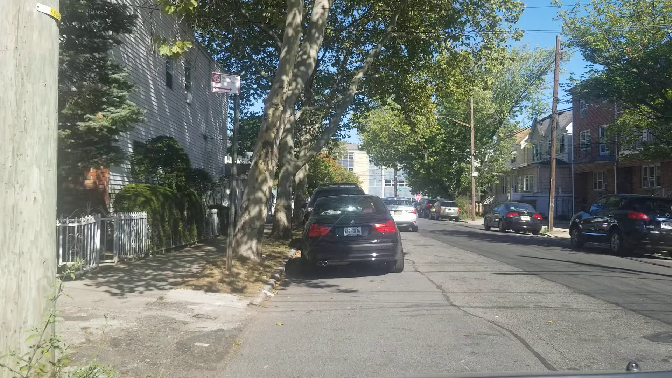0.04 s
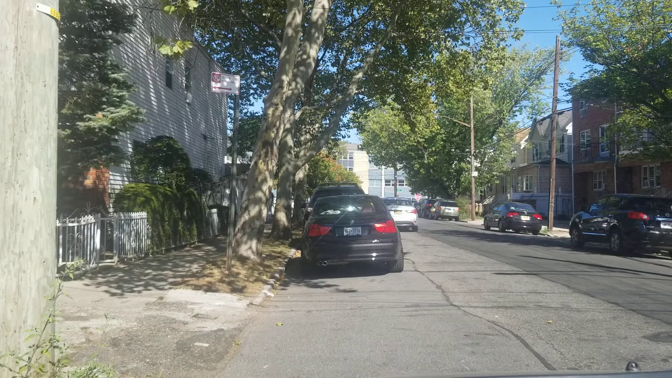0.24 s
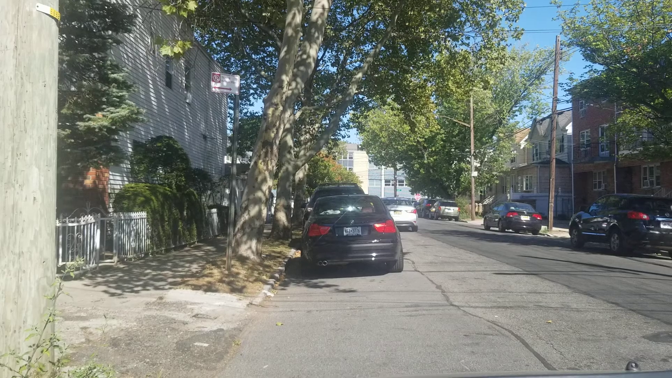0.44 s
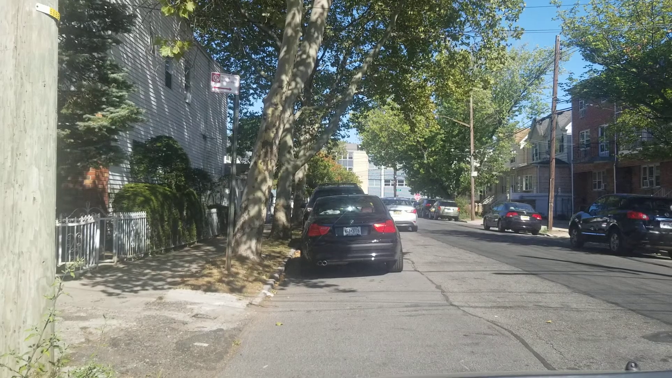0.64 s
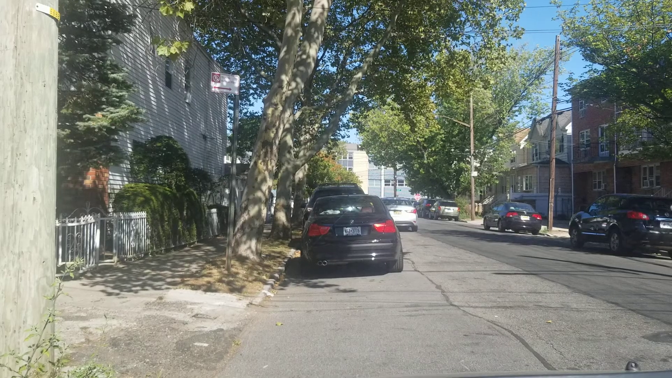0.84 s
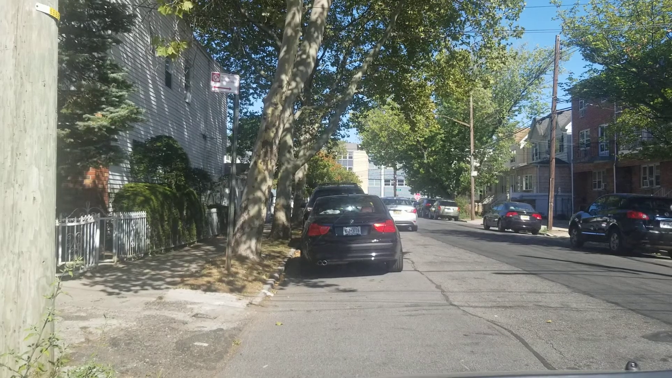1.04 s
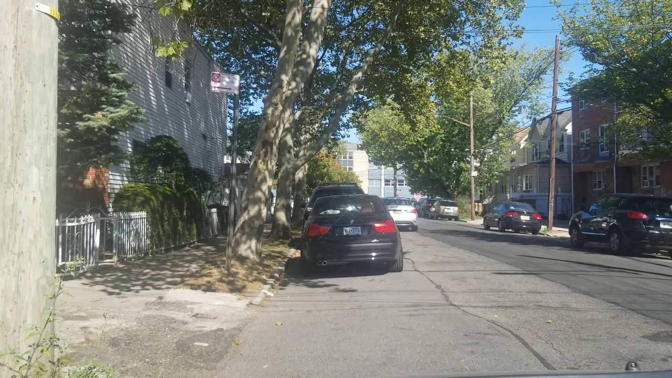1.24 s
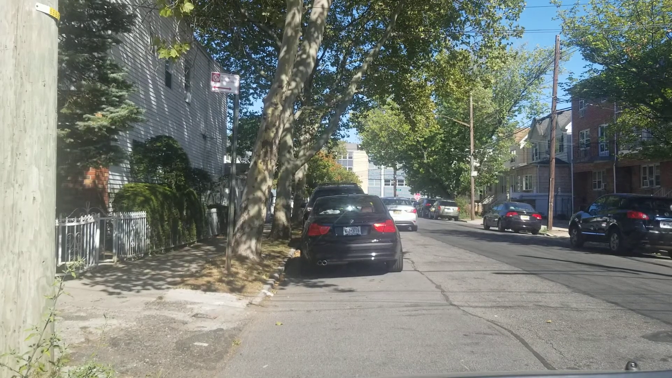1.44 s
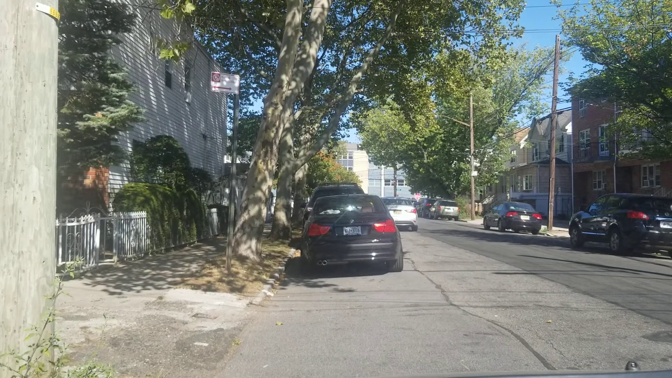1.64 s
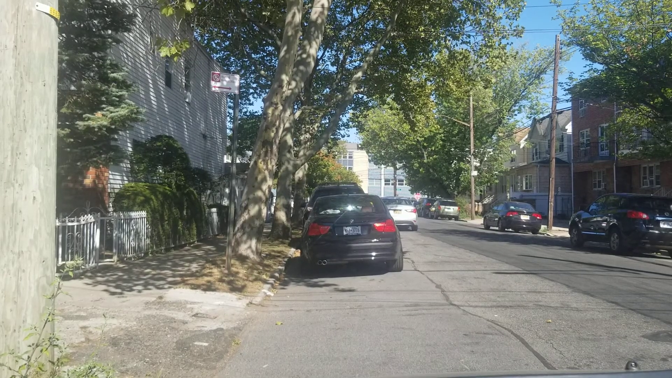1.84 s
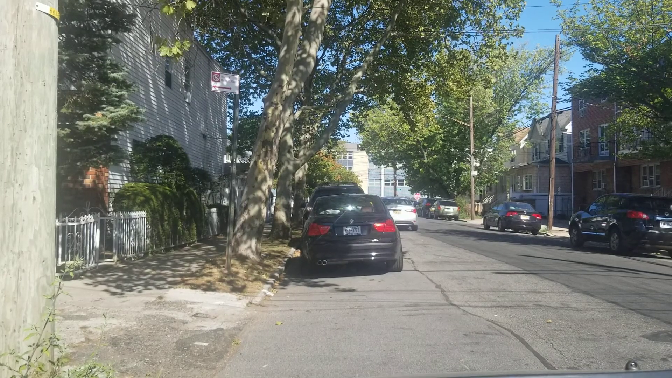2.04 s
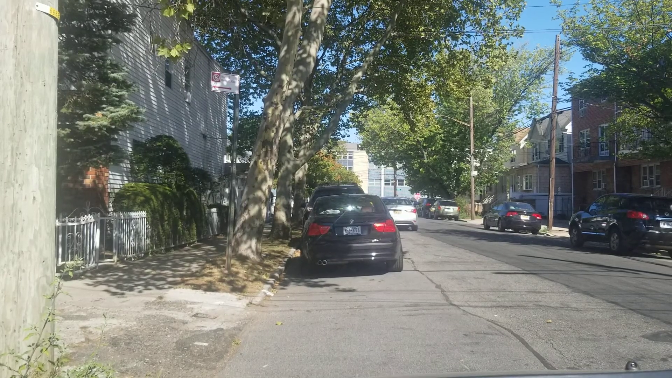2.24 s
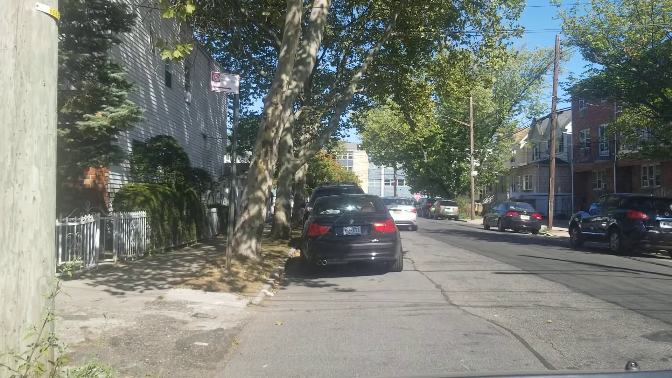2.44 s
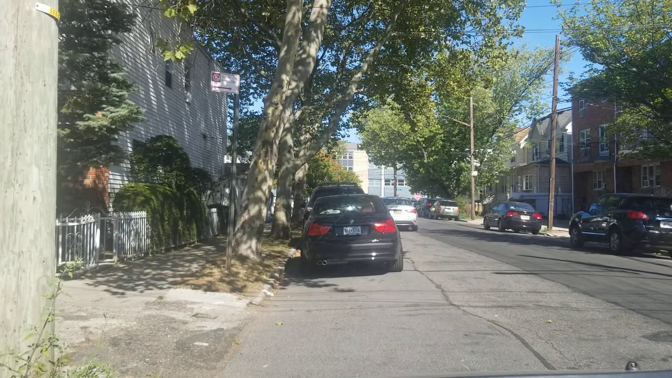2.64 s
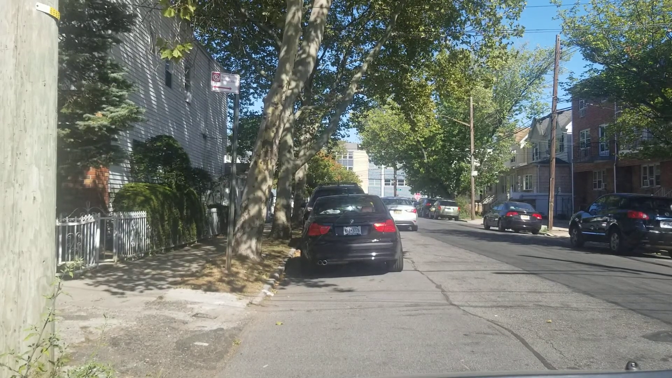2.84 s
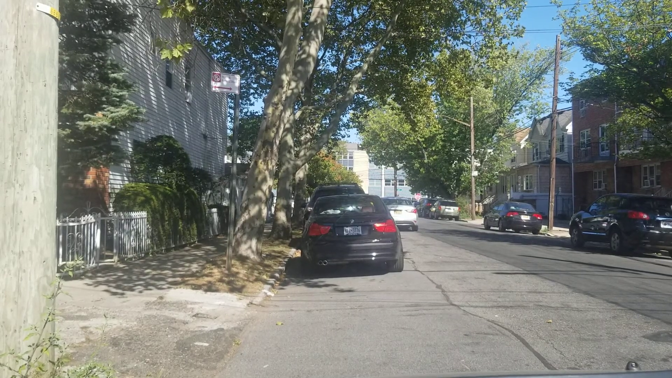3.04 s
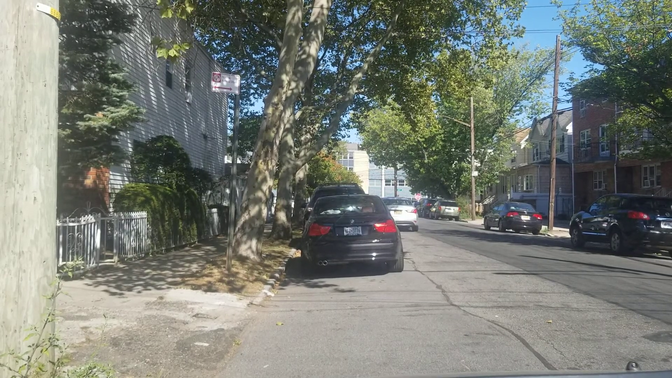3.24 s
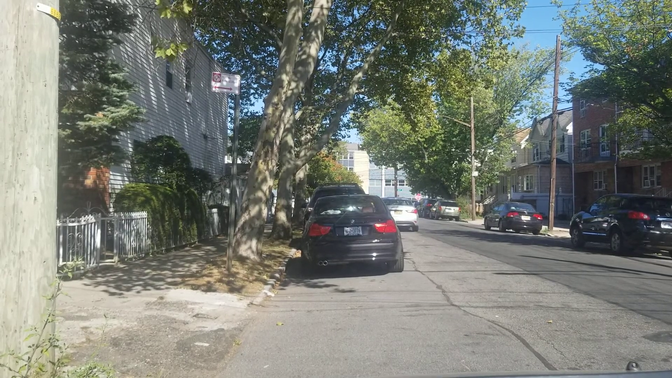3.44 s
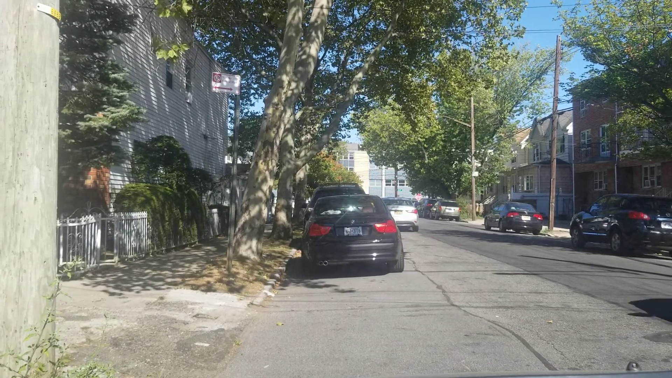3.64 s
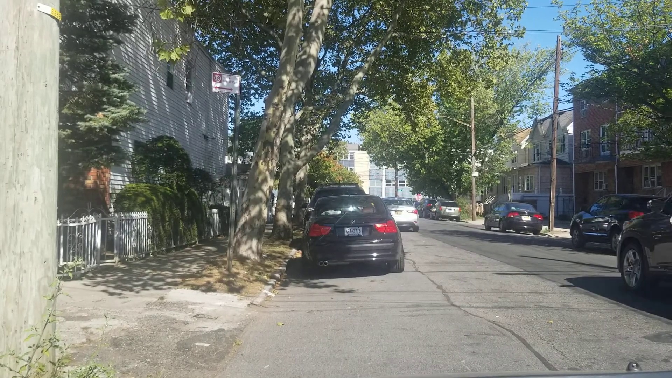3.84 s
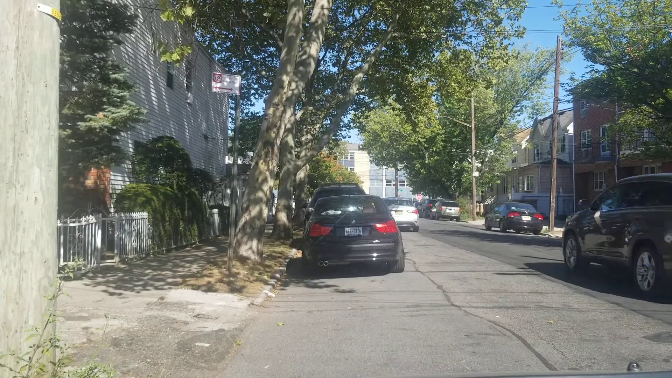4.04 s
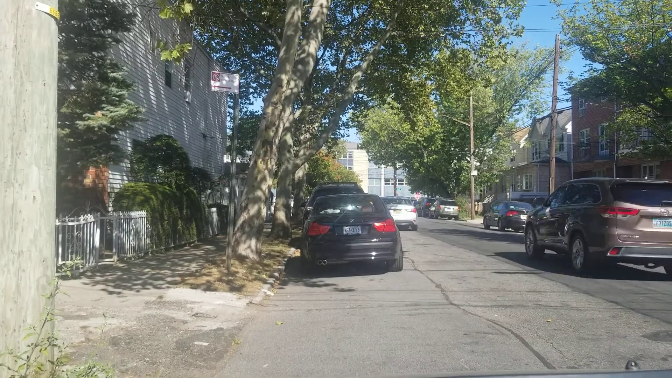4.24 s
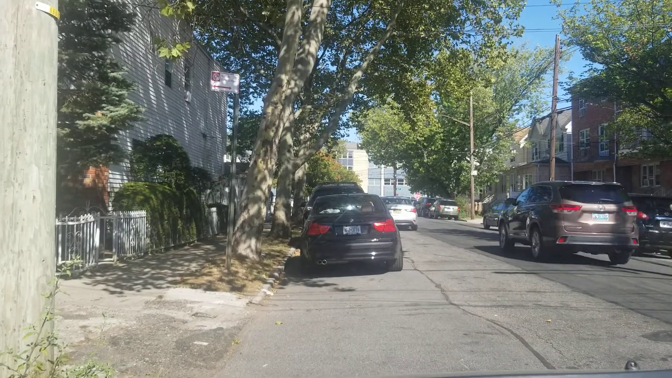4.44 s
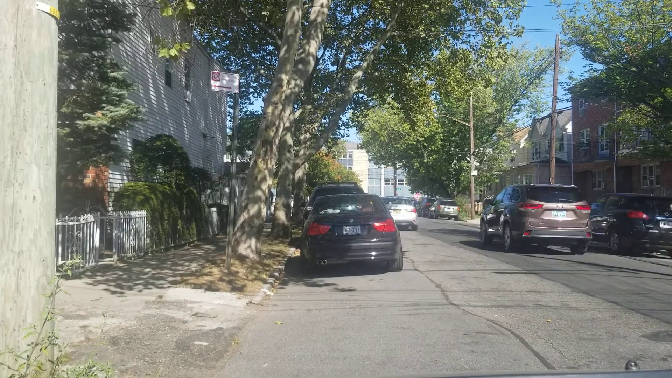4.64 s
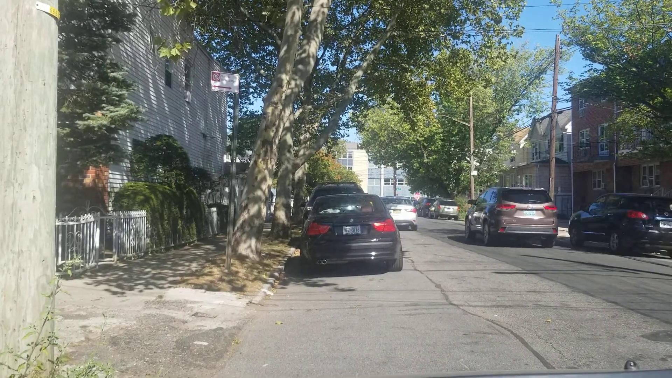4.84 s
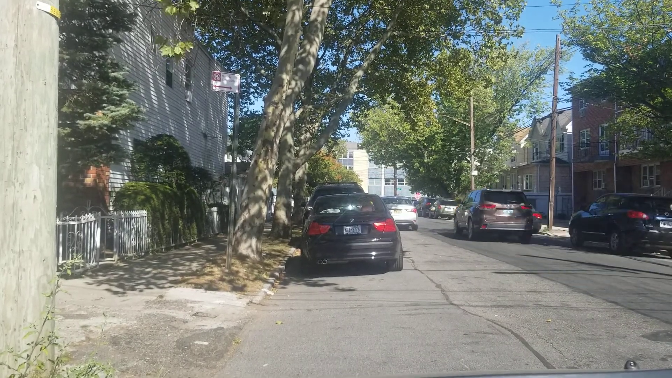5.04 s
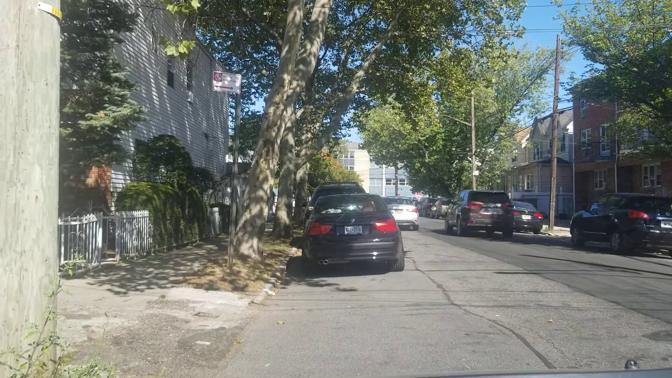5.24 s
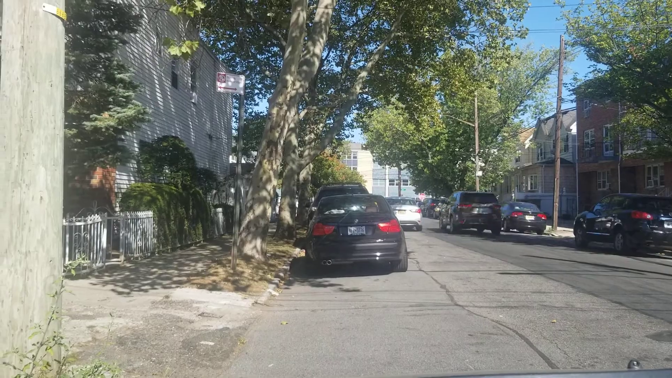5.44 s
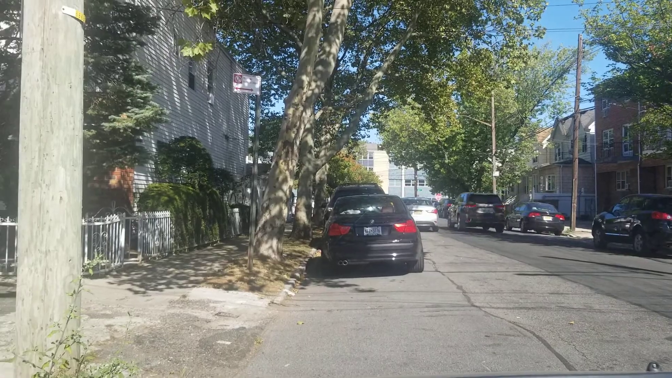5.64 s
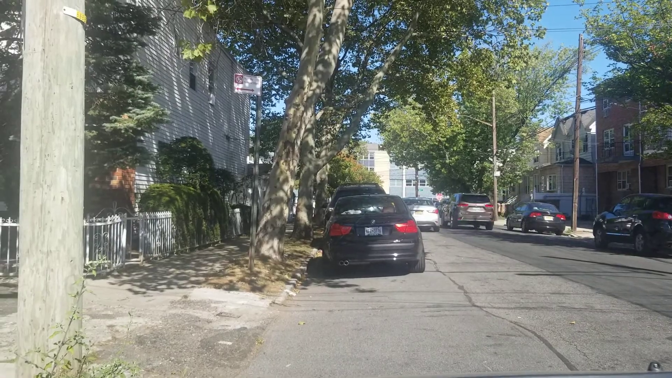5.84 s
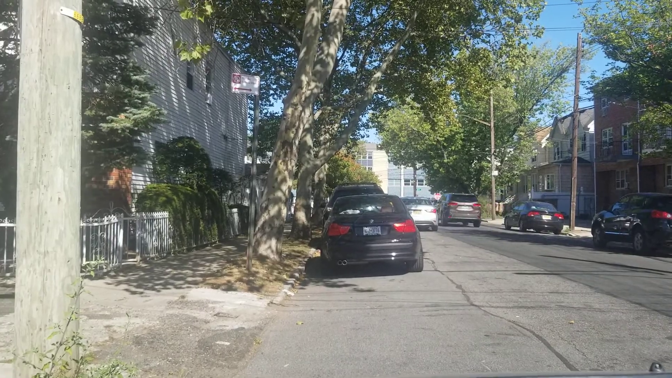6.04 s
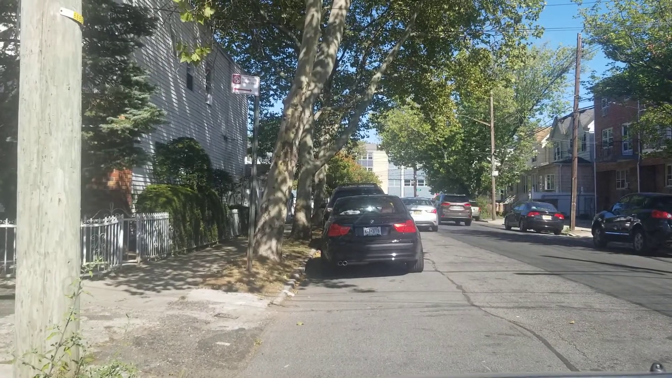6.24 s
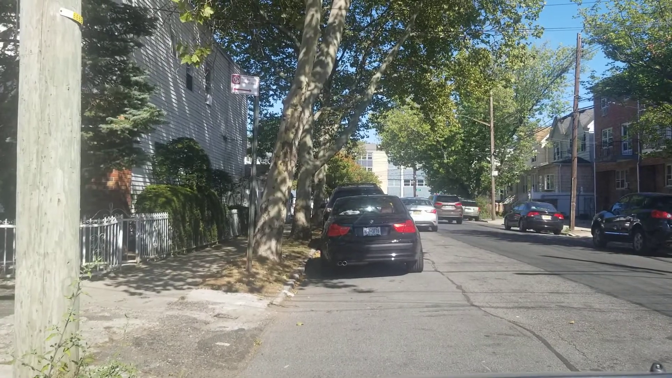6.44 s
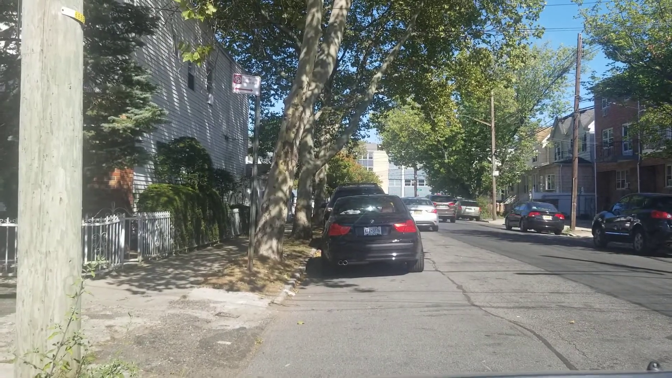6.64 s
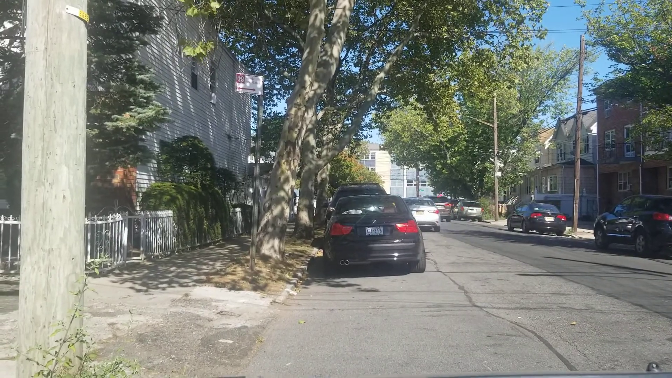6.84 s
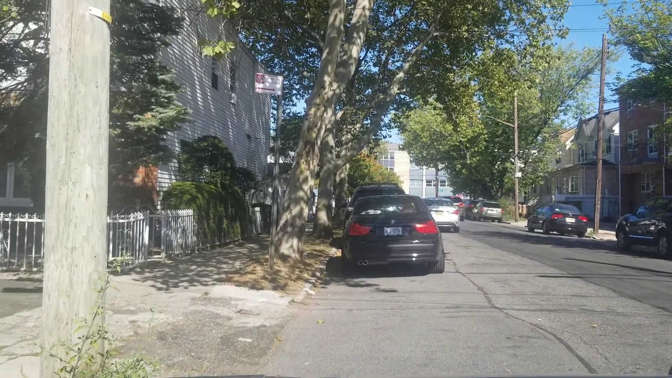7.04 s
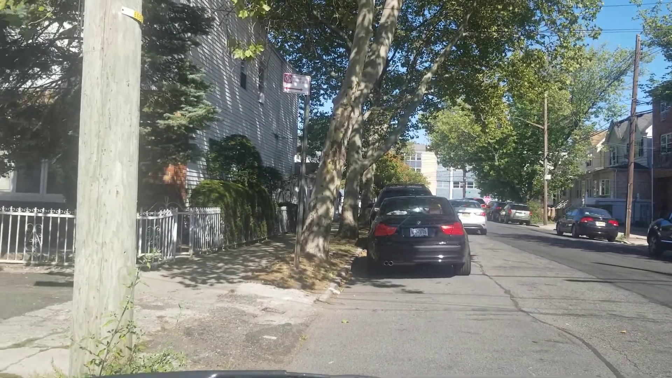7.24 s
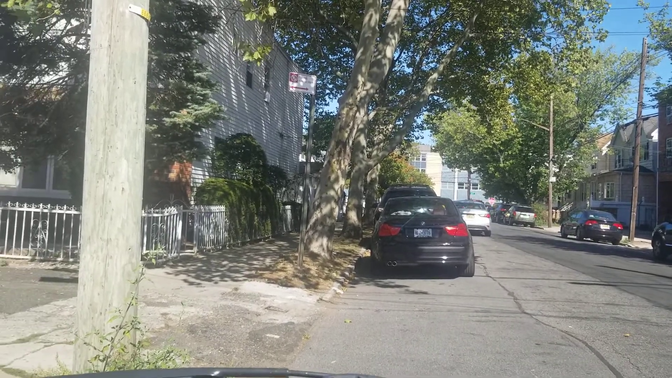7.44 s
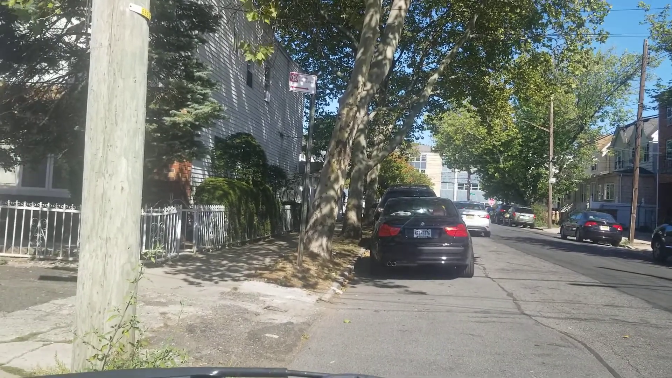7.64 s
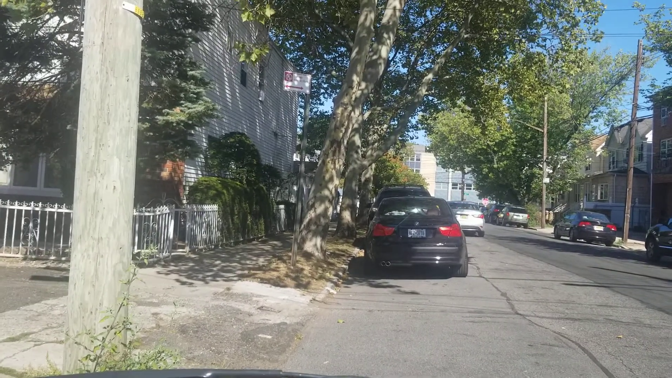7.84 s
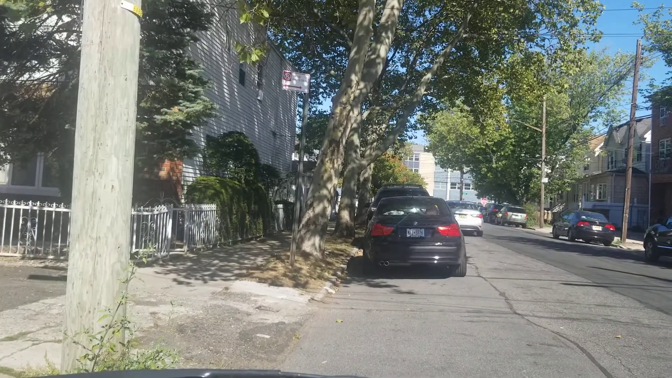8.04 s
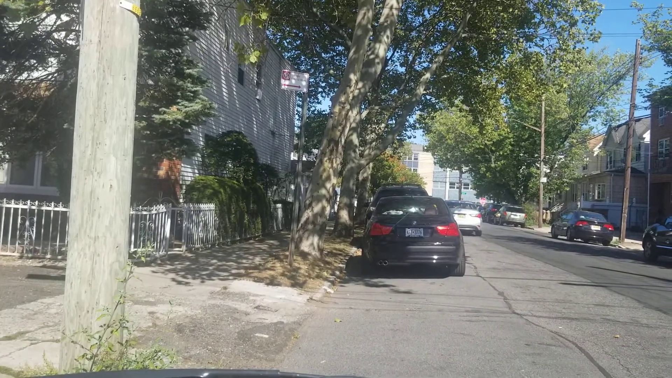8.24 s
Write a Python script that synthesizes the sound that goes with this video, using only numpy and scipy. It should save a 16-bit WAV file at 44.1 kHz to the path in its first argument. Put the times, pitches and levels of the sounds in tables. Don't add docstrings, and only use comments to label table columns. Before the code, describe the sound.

In a small, dry car cabin, deep idle rumble and faint vent air run throughout. Trim squeaks briefly, fabric rustles against the seat, and dull thumps come through the seat and floor. Muffled tyre roar from a passing car swells and falls away by four seconds. After that, bright snapping levers and uneven ratchet clicks, with little rattles, dominate very close to the stereo microphone.

```python
import sys
import numpy as np
from scipy import signal
from scipy.fft import rfft, irfft, next_fast_len
from scipy.io import wavfile

SR = 44100
rng = np.random.default_rng(int(sys.argv[2]) if len(sys.argv) > 2 else 0)


def file_out(sig):
    cols = np.atleast_2d(sig).T
    lim = np.clip(cols, -1, 1)
    pcm = np.round(lim * 32767).astype(np.int16)
    wavfile.write(sys.argv[1], SR, pcm)


def field_ratio(decibels):
    return 10 ** (np.asarray(decibels, dtype=float) / 20)


N = 366030


def rms_one(x):
    return x / np.sqrt(np.mean(x ** 2) + 1e-20)


def at_hz(points, hz):
    table_hz, value = np.transpose(points)
    return np.interp(np.log(hz), np.log(table_hz), value)


def sides(db):
    return field_ratio([[db / 2], [-db / 2]])


def drift(rate_hz):
    r = np.exp(-80 * np.pi * rate_hz / SR)
    slow = signal.lfilter([1], [1, -2 * r, r * r], rng.standard_normal(N // 40 + 2002))[2000:]
    return np.interp(np.arange(N) / 40, np.arange(len(slow)), rms_one(slow))


def ring(x, hz, t60):
    r, w = field_ratio(-60 / (t60 * SR)), 2 * np.pi * hz / SR
    return signal.lfilter([0, np.sin(w)], [1, -2 * r * np.cos(w), r * r], x)


def band(x, low_hz, high_hz):
    return signal.sosfilt(signal.butter(2, [low_hz, high_hz], "band", fs=SR, output="sos"), x)


def steep_band(x, low_hz, high_hz):
    return band(band(x, low_hz, high_hz), low_hz, high_hz)


def add(out, s, sound):
    i = int(s * SR)
    out[:, i:i + sound.shape[1]] += sound[:, :N - i]


def swell(s, half_s, stop=1.0):
    t = np.arange(N) / SR - s
    return np.exp(-(t / (half_s * np.where(t > 0, stop, 1))) ** 2)


# frequency in Hz, left-right likeness from -1 to 1.
PORT_LIKENESS = [(60, 0.94), (130, 1), (290, 0.76), (640, 0.042), (1410, -0.64), (3100, 0.32), (6820, -0.2),
                 (15000, 0.14)]
# frequency in Hz, left-right difference in dB.
CABIN_LEANING = [(60, 4), (110, -0.5), (200, 2), (380, 3), (700, -3.5), (1290, 1), (2380, 0), (4400, 0.5),
                 (8120, 5.5), (15000, -2)]


def coloured(spectrum, patchy_db, alike_share, tilt_db=0):
    size = next_fast_len(N)
    lowest, highest = spectrum[0][0], spectrum[-1][0]
    bins = np.maximum(np.arange(size // 2 + 1) * SR / size, 1)
    shape = field_ratio(at_hz(spectrum, bins)) * (bins > lowest) * (bins < highest)
    white = rms_one(irfft(rfft(rng.standard_normal((2, 2, size))) * shape, size)[..., :N])
    edges = np.geomspace(lowest, highest, int(1.5 * np.log2(highest / lowest)) + 2)
    together, out = drift(4.2), 0
    for k, (low, high) in enumerate(zip(edges, edges[1:])):
        mid, side = band(white[k % 2], low, high)
        hz = np.sqrt(low * high)
        alike = np.clip(alike_share * at_hz(PORT_LIKENESS, hz), -1, 1)
        gain = field_ratio(patchy_db * (together + drift(9.0)) + tilt_db * (hz > 8000))
        pair = np.sqrt(1 + alike) * mid + np.sqrt(1 - alike) * side * [[1], [-1]]
        out = out + gain * sides(at_hz(CABIN_LEANING, hz)) * pair
    return out / np.sqrt(2)


# frequency in Hz, density in dB per Hz.
CABIN_AIR = [(8.2, -58), (14, -3.5), (43, 3), (90, -5), (144, -4), (205, -20.5), (310, -6), (528, -17),
             (775, -22.5), (925, -25), (1620, -27), (2110, -62.5), (6300, -39.5), (8460, -53.5),
             (16400, -44.5)]
# frequency in Hz, width in Hz, level in dB.
VENT_DUCTS = [(1620, 64, -71), (2540, 65, -70)]


def cabin():
    air = rng.standard_normal((2, N))
    tones = 0
    for hz, width, db in VENT_DUCTS:
        tones = tones + field_ratio(db + 2 * drift(5.3)) * rms_one(ring(air, hz, 2.2 / width))
    return field_ratio(-49) * coloured(CABIN_AIR, patchy_db=1.0, alike_share=1.0) + tones


# multiple of the turn rate, level in dB.
ENGINE_ORDERS = [(2, 2), (3, -6), (4, -9.5), (5, -16.5), (6, -9), (7, -3), (8, -4), (9, -8.5), (11, -14),
                 (12, -18), (13, -17), (15, -24), (16, -7.5), (17, -46), (18, -16.5), (24, -18),
                 (32, -21.5), (40, -23)]


def engine():
    idle_hz, wobble_db, wobble_rad = 18.86, 0.5, 0.11
    angle = 2 * np.pi * idle_hz * np.arange(N) / SR
    out = np.zeros((2, N))
    for order, level_db in ENGINE_ORDERS:
        phase = order * angle + rng.uniform(0, 2 * np.pi) + wobble_rad * np.sqrt(order) * drift(0.88)
        lag = np.arccos(np.clip(at_hz(PORT_LIKENESS, 19 * order), -1, 1)) / 2
        out += field_ratio(level_db + wobble_db * drift(2.7)) * np.sin(phase + lag * np.array([[-1], [1]]))
    return field_ratio(-48) * np.sqrt(2) * sides(2.1) * out


# frequency in Hz, level in dB.
PUMP_TONES = [(25.0, -48), (50, -56.5)]


def pump():
    t, waver = np.arange(N) / SR, drift(0.49) / 2
    out = 0
    for hz, db in PUMP_TONES:
        out = out + field_ratio(db + waver) * np.sqrt(2) * np.sin(2 * np.pi * hz * t + waver / 2)
    return out * sides(2.5)


# time in seconds, tyre roar in dB.
PASSING_ROAR = [
    (0.2, -62),
    (0.6, -57.5),
    (1.27, -51.5),
    (2.2, -47),
    (2.8, -40.5),
    (3.15, -40.5),
    (3.42, -44.5),
    (3.62, -46),
    (4.4, -61.5),
]
# time in seconds, half length in seconds, extra boom in dB.
ROAD_BUMPS = [
    (1.18, 0.17, 10),
    (3.63, 0.19, 2),
    (3.356, 0.14, 7.5),
    (2.18, 0.31, -1.5),
]
# frequency in Hz, density in dB per Hz.
BODY_BOOM = [(18, -37), (30, 2), (92, -3.5), (146, 4.5), (189, -3.5), (243, -1), (400, -14), (520, -55),
             (880, -120)]
# frequency in Hz, density in dB per Hz.
TYRE_ROAR = [(200, -51), (300, -8), (520, -2.5), (660, -9.5), (830, -0.5), (980, -12.5), (1250, -10),
             (1620, -6.5), (1800, -9.5), (3000, -23), (5000, -45)]


def passing():
    s, roar_at = np.transpose(PASSING_ROAR + [(4.35, -76)])
    roar_db = np.interp(np.arange(N) / SR, s, roar_at)
    roar = field_ratio(roar_db - 0.5) * coloured(TYRE_ROAR, patchy_db=1.5, alike_share=1.0)

    bump_db = sum(db * swell(s, half_s) for s, half_s, db in ROAD_BUMPS)
    boom_db = -51 + 0.86 * (roar_db + 51.0) + bump_db
    boom = field_ratio(boom_db) * coloured(BODY_BOOM, patchy_db=3.0, alike_share=0.96)

    wash = rms_one(band(rng.standard_normal((2, N)) + rng.standard_normal(N), 430, 730))
    wash = field_ratio(-43.5) * swell(3.15, 0.31) * wash
    tread = rms_one(steep_band(rng.standard_normal((2, N)), 750, 910))
    tread = field_ratio(-54 + 2 * drift(6.3)) * swell(2.4, 0.6, stop=0.42) * tread
    drone = rms_one(ring(rng.standard_normal(N), 142, 0.095))
    drone = field_ratio(-42) * swell(3.3, 0.2, stop=0.78) * drone
    return roar + boom + wash + tread + drone


# time in seconds, half length in seconds, rub level in dB.
CLOTH_MOVES = [(0.454, 0.067, -63.5), (0.575, 0.068, -51), (1.065, 0.25, -62), (1.324, 0.12, -48.5),
               (1.61, 0.11, -56.5), (1.904, 0.37, -65.5), (2.073, 0.028, -53), (2.873, 1, -57),
               (2.343, 0.044, -47), (2.594, 0.04, -49.5), (2.77, 0.11, -48), (2.946, 0.072, -66),
               (3.296, 0.13, -47), (3.55, 0.17, -85), (4.04, 0.31, -62.5), (4.915, 0.083, -71),
               (5.5, 0.38, -77.5), (5.973, 0.049, -58), (6.423, 0.24, -64.5), (6.74, 0.16, -63),
               (7.154, 0.28, -68), (7.52, 0.43, -69), (8.073, 0.47, -70.5)]
# frequency in Hz, density in dB per Hz.
RUB_COLOUR = [(1000, -3), (1800, 3.5), (3300, 4.5), (5000, 4), (7200, 1.5), (7900, -12), (9000, -16),
              (11000, -8.5), (15500, -10.5), (16400, -13.5)]


def cloth():
    moves = sum(field_ratio(db) * swell(s, half_s, stop=0.74) for s, half_s, db in CLOTH_MOVES)
    rub = field_ratio(-68) + moves
    bright_db = -3 + 0.44 * (20 * np.log10(rub) + 60)
    return field_ratio(1.0) * rub * coloured(RUB_COLOUR, patchy_db=1.2, alike_share=0.49, tilt_db=bright_db)


# start in seconds, length in seconds, from Hz, to Hz, level in dB.
TRIM_SQUEAKS = [
    (0.1, 0.21, 7100, 7100, -59.5),
    (0.26, .32, 8340, 6840, -45),
    (0.049, 0.16, 3100, 2500, -61),
    (0.43, .16, 6100, 7600, -63),
    (0.643, 0.13, 2400, 2700, -59),
]
# start in seconds, length in seconds, from Hz, to Hz, level in dB.
THIN_WHISTLES = [
    (5.018, 0.13, 4440, 4380, -65),
    (5.52, 0.19, 8550, 8450, -74),
    (6.336, 0.3, 8400, 8130, -74),
]


def squeaks(rows, blur_share):
    out = np.zeros((2, N))
    for s, length, from_hz, to_hz, db in rows:
        part = np.arange(int(length * SR)) / (length * SR)
        angle = 2 * np.pi * np.cumsum(to_hz + (from_hz - to_hz) * (1 - part) ** 3.0) / SR
        blur = rms_one(steep_band(rng.standard_normal((4, len(part))), 5.5, max(blur_share * to_hz, 20)))
        tone = blur[:2] * np.sin(angle) + blur[2:] * np.cos(angle)
        octave = blur[::2] * blur[1::2] * np.sin(2 * angle) + blur[:2] * blur[:1:-1] * np.cos(2 * angle)
        add(out, s, field_ratio(db) * np.sin(np.pi * part ** 0.63) ** 2.9 * (tone + 0.07 * octave))
    return out


# frequency in Hz, width in Hz, level in dB.
SEAM_HOLLOWS = [(7460, 49, 8.5), (6770, 77, -1), (6780, 80, 10)]


def seam(x):
    out = field_ratio(1.0) * x
    for k, (hz, width, db) in enumerate(SEAM_HOLLOWS):
        out = out + (-1) ** k * field_ratio(db) * 4.1 * width / SR * ring(x, hz, 3.8 / width)
    return out


def push(hz, t60, turns, stiff_s, lag_s):
    lag = lag_s + 0.00025 * rng.uniform(-1.96, 1)
    t = np.maximum(np.arange(SR // 5) / SR - [[max(-lag, 0)], [max(lag, 0)]], 0)
    return -field_ratio(-60 * t / t60) * np.sin(2 * np.pi * (hz * t + turns * (1 - np.exp(-t / stiff_s))))


# time in seconds, peak in dB, frequency in Hz, shudder in dB, left-right difference in dB.
SEAT_KNOCKS = [(1.064, -23, 72.7, -7, -2), (1.077, -26, 109, 4, -4), (1.095, -27.5, 77.6, -7, 0),
               (1.116, -34, 80.7, 0, 7), (2.705, -29, 121, -4, 3), (3.194, -28, 154, -17, 3),
               (3.6195, -17, 135.6, -11.5, 1), (3.744, -25.5, 169, -15, 0), (3.722, -30.5, 259, -8, 3),
               (3.907, -30, 117, 3, 3), (3.949, -22, 182, -11, 0), (4.121, -33.5, 107, -19.5, -1),
               (4.814, -35, 143, -2.5, -19), (4.994, -40.5, 153, -21, 20), (5.113, -30.5, 163, -17, 16),
               (5.973, -34, 125, -11, 23), (6.184, -30.5, 115, -3.5, -19)]


def knocks():
    out, t = np.zeros((2, N)), np.arange(SR // 5) / SR
    for s, peak_db, hz, shudder_db, pan_db in SEAT_KNOCKS:
        noise = rng.standard_normal(len(t)) + 0.5 * rng.standard_normal((2, len(t)))
        fade = field_ratio(shudder_db - 60 * t / 0.053) * np.minimum(t / 0.0053, 1)
        shudder = rms_one(band(noise, 180, 465)) * fade
        thump = push(hz, t60=0.094, turns=0.28, stiff_s=0.0013, lag_s=0.00035)
        add(out, s, field_ratio(peak_db) * sides(pan_db) * (thump + shudder))
    return out


# time in seconds,
# frequency in Hz, peak in dB, t60 in seconds.
RINGING_PARTS = [(1.063, 455, -22.5, 0.1), (1.075, 464, -15, 0.041), (1.076, 795, -22.5, 0.041),
                 (1.089, 322, -34, 0.05), (1.112, 513, -36, 0.21), (1.068, 594, -25.5, 0.052),
                 (1.3, 507, -44, 0.44), (1.57, 610, -40, 0.18), (1.07, 230, -30, 0.08),
                 (1.07, 900, -24, .04), (2.71, 473, -25, 0.035), (2.95, 250, -30.5, 0.27),
                 (3.17, 242, -27.5, .2), (3.7153, 1200, -24, 0.016), (3.94, 1160, -23.5, 0.027),
                 (1.065, 403, -26.5, 0.16), (3.7151, 2470, -15, 0.043), (3.7159, 5590, -9.5, 0.022),
                 (3.7155, 4800, -23, 0.05), (3.941, 5480, -8.5, 0.032), (5.114, 515, -33.5, 0.033),
                 (5.449, 3750, -31, 0.066), (5.98, 288, -23.5, 0.083), (5.99, 240, -26, 0.05),
                 (5.3273, 3770, -15, 0.019), (5.713, 3720, -16, .016), (8.079, 4050, -19, 0.017),
                 (7.958, 1180, -42, .1), (6.98, 3780, -32, 0.065), (7.185, 3700, -22, 0.054),
                 (7.185, 2745, -37, 0.1), (7.185, 4786, -47, .12), (7.958, 3720, -26, 0.091),
                 (7.958, 4240, -32, .07), (7.958, 894, -37, 0.14), (7.958, 1295, -36, 0.2),
                 (7.958, 1446, -34, 0.19), (7.958, 1580, -43, .15), (7.958, 2400, -37, 0.21)]


def rings():
    out, t = np.zeros((2, N)), np.arange(SR // 4) / SR
    for s, hz, peak_db, t60 in RINGING_PARTS:
        fall = field_ratio(-60 * t / t60)
        rattle = ring(rng.standard_normal((2, len(t))) * fall, hz, t60 / 2.8)
        pure = fall * np.minimum(t / 0.002, 1) * np.sin(2 * np.pi * (hz * t + rng.random((2, 1))))
        steady = min(t60 / 0.2, 0.45) * (hz > 850)
        add(out, s, field_ratio(peak_db) * ((1 - steady) * rattle / np.abs(rattle).max() + steady * pure))
    return out


def shaped(x, *tables, lean):
    size = 2 * x.shape[-1]
    hz = np.maximum(np.arange(size // 2 + 1) * SR / size, 1)
    db = sum(at_hz(table, hz) for table in tables) + at_hz(lean, hz) * np.array([[0.5], [-0.5]])
    log_gain = np.log(rms_one(field_ratio(db)))
    fold = irfft(log_gain, size) * np.r_[1, 2 * np.ones(size // 2 - 1), 1, np.zeros(size // 2 - 1)]
    return irfft(rfft(x, size) * np.exp(rfft(fold)), size)[:, :x.shape[-1]]


# frequency in Hz, density in dB per Hz.
SCATTER_COLOUR = [(400, -7.5), (750, -8), (1100, -13), (2000, -9.5), (3000, -9.5), (3700, -1.5),
                  (4300, -5.5), (6700, -9.5), (7900, -24.5), (10000, -29), (14000, -18.5), (16500, -47)]
# frequency in Hz, left-right difference in dB.
SCATTER_SIDE = [(700, 4), (1500, 6), (2600, -2), (3700, -6.5), (5000, 1), (13000, -11)]
# frequency in Hz, level in dB, t60 in seconds.
CABIN_HOLLOWS = [(1690, -9.5, 0.02), (2670, -10.5, 0.025), (3050, -1.5, 0.025), (3730, -1, 0.03),
                 (4080, -0.5, 0.025), (5400, -7, 0.015), (6700, -8.5, 0.012)]


def scatter(db):
    t = np.arange(SR // 9) / SR
    noise = rng.standard_normal((2, len(t))) * np.minimum(t / 0.00055, 1)
    dull = signal.sosfilt(signal.butter(2, 5100, fs=SR, output="sos"), noise)
    drive = noise * field_ratio(-60 * t / 0.033) + dull * field_ratio(-14.5 - 60 * t / 0.13)
    hollows = 0
    for hz, level_db, t60 in CABIN_HOLLOWS:
        chance_db = 2 * rng.standard_normal()
        hollows = hollows + field_ratio(level_db - 1.5 + chance_db) * ring(drive, hz, t60) / np.sqrt(t60 * SR)
    return field_ratio(db) * (shaped(drive, SCATTER_COLOUR, lean=SCATTER_SIDE) + sides(-2.0) * hollows)


# time in seconds, level in dB.
HIT_SCATTER = [(5.2461, -34), (5.3273, -32), (5.396, -29), (5.4477, -32), (5.5176, -32.5), (5.7126, -30),
               (5.774, -30), (5.9778, -25.5), (5.9985, -26), (6.6292, -34), (6.6552, -29.5), (6.6883, -29),
               (6.7158, -26.5), (6.9437, -28), (6.98, -23.5), (7.109, -24.5), (7.1344, -26), (7.1845, -28),
               (7.41, -26), (7.4266, -23), (7.4349, -26.5), (7.472, -27), (7.7652, -26.5), (7.7924, -29.5),
               (7.8342, -29), (7.8872, -35), (7.9578, -24), (8.079, -29), (8.0971, -32), (8.1394, -32)]


def hit_scatter():
    out = np.zeros((2, N))
    for s, db in HIT_SCATTER:
        add(out, s, scatter(db))
    return out


def contact(modes, edge_db, tail_db, crack_s, tail_t60, spike):
    t = np.arange(SR // 9) / SR
    crack = rng.standard_normal(len(t)) * np.exp(-t / crack_s)
    crack[0] = spike
    grit = field_ratio(2 + 3.5 * rng.standard_normal(len(t) // 32 + 1)).repeat(32)[:len(t)]
    tail = rng.standard_normal((2, len(t))) * grit * field_ratio(tail_db) * np.minimum(t / 0.000087, 1)
    dull = band(tail * (field_ratio(-60 * t / tail_t60) + field_ratio(-0.5 - 25 * t / tail_t60)), 520, 10200)
    bright = 8.2 * tail * field_ratio(-60 * t / (0.56 * tail_t60))
    drive = np.stack([np.roll(crack, rng.integers(0, 9)), crack]) + dull + bright

    body = 0
    for k, (hz, db, t60) in enumerate(modes):
        chance_db = 2.5 * rng.standard_normal((2, 1))
        body = body + (-1) ** k * field_ratio(db + chance_db) * ring(drive, hz, t60)
    body = signal.sosfilt(signal.butter(4, 7800, fs=SR, output="sos"), body)

    fizz = rng.standard_normal((2, len(t))) * np.exp(-t / 0.0009) + 3.2 * tail * field_ratio(-60 * t / 0.051)
    edge = steep_band(fizz, 8900, 15000)
    return body / np.abs(body).max(axis=1).mean() + field_ratio(edge_db + 8.5) * edge / np.abs(edge).max()


# time in seconds, crack in dB, ring in Hz, edge above 9 kHz in dB, scrape tail in dB.
LATCH_HITS = [(1.0643, -30.5, 2310, -27, -15), (1.075, -29, 2940, -20.5, -17), (1.1628, -55, 2480, -26, -8),
              (1.218, -33, 3720, -21, -21), (2.4, -18.5, 4540, -26, 0), (2.708, -24, 4280, -21, 20),
              (2.9481, -34, 2090, -32, 1.5), (3.611, -20.5, 4400, -29, -13),
              (3.7158, -16.5, 4620, -28, -19.5), (3.7883, -38.5, 3240, -27, -21),
              (3.884, -43, 2890, -28, -11), (3.8973, -25.5, 3270, -37, 2), (3.9048, -17, 2770, -26, 15),
              (3.94, -14.5, 5030, -18, -9), (4.0674, -26.5, 4110, -20, -26),
              (4.117, -22.5, 4210, -13.5, -6)]
# frequency in Hz, level in dB, t60 in seconds.
STRUCK_MODES = [(1460, 4, 0.0047), (2370, -10, 0.04), (3750, -4, 0.0064), (4140, -14, 0.033),
                (4650, -14, 0.0085), (5100, -38, 0.0039), (5950, 15.5, 0.00095), (7900, -9, 0.0067)]


def latch():
    out = np.zeros((2, N))
    for s, crack_db, hz, edge_db, tail_db in LATCH_HITS:
        modes = [(f, db - 4.0 * abs(np.log2(f / hz)), t60) for f, db, t60 in STRUCK_MODES]
        modes.append((hz, 8.0, 0.002))
        hit = contact(modes, edge_db, tail_db, crack_s=0.0028, tail_t60=0.059, spike=12.3)
        add(out, s, field_ratio(crack_db + 5.0) * sides(4) * hit)
    return signal.sosfilt(signal.butter(3, 1250, "high", fs=SR, output="sos"), out)


# time in seconds, crack in dB, push in dB, left-right difference in dB, ring in Hz.
TRIM_TAPS = [(3.6055, -31, -42, 5, 3500), (3.737, -30.5, -35, 3, 1000), (4.8178, -48, -42, -19, 1200),
             (4.8211, -51, -30.5, -23, 1010), (4.856, -30, -38, -7, 5600), (5.011, -39.5, -53, 3, 4460),
             (5.1964, -39, -34, 2, 2000), (5.923, -45.5, -51, -15, 6070), (6.1272, -45.5, -27, -34.5, 960),
             (6.1467, -44, -33, -19, 1170), (6.1801, -46, -32, -27, 950), (6.1891, -39.5, -47, -27, 950),
             (6.4047, -47.5, -32, -31, 1020), (6.452, -68, -28.5, -25, 930),
             (6.5561, -36, -28.5, -20, 1230), (6.573, -48, -35, -12, 900), (6.9348, -44, -37, -14, 2130)]
# time in seconds, crack in dB, push in dB, left-right difference in dB, ring in Hz.
LEVER_DETENTS = [(3.9398, -10.5, -34.5, 7, 5400), (5.2404, -20, -29, 2, 3430),
                 (5.2461, -10, -22, 4.5, 4080), (5.3188, -21, -27, -9, 3630), (5.3235, -21, -22, 14, 1700),
                 (5.3273, -11, -18.5, 8.5, 3780), (5.365, -26, -37, 6, 3480), (5.396, -9.5, -21, 0.5, 3600),
                 (5.4025, -28, -32, 12, 1190), (5.4477, -22, -35, 6, 3640), (5.5085, -19, -36, 1, 3550),
                 (5.5176, -23.5, -29, 19, 1290), (5.706, -18.5, -37, 1, 3840),
                 (5.7126, -12, -24, 6.5, 3600), (5.7686, -18, -26.5, 7, 3200),
                 (5.774, -22.5, -26.5, 17, 1520), (5.986, -17, -22, -5, 3640),
                 (5.9938, -31, -19.5, 22, 3000), (5.9985, -28, -44, -4, 3600), (6.0062, -25, -28, 1, 1320)]
# time in seconds, crack in dB, push in dB, left-right difference in dB, ring in Hz.
BLUNT_TEETH = [
    (5.9778, -13.5, -19, -1, 3900),
    (6.9437, -12.5, -25.5, -1, 2300),
    (8.079, -10, -18, -8, 4150),
]
# time in seconds, crack in dB, push in dB, left-right difference in dB, ring in Hz.
RATCHET_TEETH = [(6.6292, -19, -19, 7, 2950), (6.6552, -14.5, -19.5, 4, 3440), (6.6785, -24, -36, -6, 3780),
                 (6.6883, -8, -23.5, 7, 3000), (6.6925, -27, -35, -2, 4460), (6.7158, -25, -27, 5, 3900),
                 (6.7195, -27, -23.5, 9, 1620), (6.7372, -29, -34, 5, 3600), (6.98, -11.5, -28, 9.5, 3780),
                 (7.109, -9.5, -20.5, -1, 3270), (7.1276, -11, -24, 2, 4250),
                 (7.1344, -12.5, -35, -5, 3770), (7.1365, -16, -33, 13, 970), (7.1845, -20, -36, 4, 3780),
                 (7.41, -14.5, -22.5, -6, 3300), (7.4266, -6.5, -26, -3, 3200),
                 (7.4349, -18, -25, 16, 2640), (7.472, -12.5, -34, 3, 3620), (7.7652, -16, -17, 6.5, 3400),
                 (7.7823, -30, -46, 1, 2000), (7.7924, -8.5, -15, 4, 3100), (7.8052, -25, -40, 11, 2500),
                 (7.8342, -9.5, -15.5, 5, 2290), (7.8872, -11.5, -15.5, 2.5, 2870),
                 (7.9578, -14, -27, 0.5, 3780), (8.0935, -27, -35, 1, 1300), (8.0971, -19.5, -32, -2, 3760),
                 (8.1394, -10, -15.5, 0, 3830)]
# frequency in Hz, density in dB per Hz.
CRACK_COLOUR = [(400, -15), (750, -6.5), (1100, -5), (2000, -8.5), (3700, -3.5), (5000, -9), (6700, -5.5),
                (7900, -17), (10000, -13.5), (15000, -11), (17500, -38)]
# frequency in Hz, left-right difference in dB.
CRACK_SIDE = [(700, -0.5), (1500, -1.5), (2600, 4.5), (3700, -2.5), (5000, -3), (13000, -0.5)]


def ratchet(rows, edge_db, scatter_db, turns):
    out, t = np.zeros((2, N)), np.arange(512) / SR
    rise_s, fall_s = 0.0003, 0.00093
    edge = [(7000, 0), (9000, edge_db)]
    for s, crack_db, push_db, pan_db, hz in rows:
        burst = rng.standard_normal(len(t)) + 0.59 * rng.standard_normal((2, len(t)))
        burst = burst * t / (t + rise_s) * np.exp(-t / fall_s)
        burst[0] = np.roll(burst[0], rng.integers(0, 9))
        bins = rfft(burst)
        burst = irfft(bins / np.abs(bins)) * np.exp(-t / (4 * fall_s))
        burst = burst / np.sqrt((burst ** 2).sum(axis=1, keepdims=True))

        slopes = [(hz / 8, -3 * 5.5), (hz, 0), (hz * 8, -3 * 5.5)]
        own_ring = [(hz * 0.78, 0), (hz, 3), (hz * 1.22, 0)]
        snap = shaped(burst, CRACK_COLOUR, slopes, own_ring, edge, lean=CRACK_SIDE)
        add(out, s - 0.0004, field_ratio(crack_db + 11.0) * sides(pan_db) * snap)
        add(out, s, scatter(crack_db + scatter_db))
        swing = push(hz=205, t60=0.034, turns=turns, stiff_s=0.0015, lag_s=-0.00015)
        add(out, s, -field_ratio(push_db - 2.5) * sides(pan_db * 0.5) * swing)
    return out


def scene():
    soft = cabin() + engine() + pump() + passing() + cloth()
    soft += seam(squeaks(TRIM_SQUEAKS, blur_share=0.045)) + squeaks(THIN_WHISTLES, blur_share=0.003)
    soft += knocks() + rings() + hit_scatter()
    clicks = latch()
    clicks += ratchet(TRIM_TAPS, edge_db=-10, scatter_db=-15.5, turns=0.47)
    clicks += ratchet(LEVER_DETENTS, edge_db=-0.5, scatter_db=-18.5, turns=0.89)
    clicks += ratchet(BLUNT_TEETH, edge_db=-8.5, scatter_db=-20, turns=0.92)
    clicks += ratchet(RATCHET_TEETH, edge_db=0.62, scatter_db=-23.5, turns=0.86)
    return signal.sosfilt(signal.ellip(10, 0.5, 60, 15850, fs=SR, output="sos"), soft) + clicks


def band_limit(x):
    return signal.sosfilt(signal.butter(12, 17030, fs=SR, output="sos"), x)


def record(dry):
    deep_cut = signal.butter(3, 19, "high", fs=SR, output="sos")
    top_cut = signal.ellip(10, 0.5, 70, 16800, fs=SR, output="sos")
    mix = signal.sosfilt(np.vstack([deep_cut, top_cut]), dry)
    return band_limit(mix)


dry = scene()
out = record(dry)
file_out(out)
```